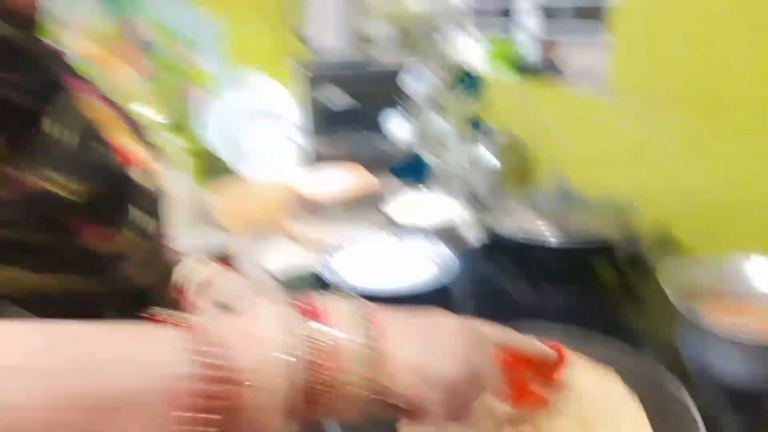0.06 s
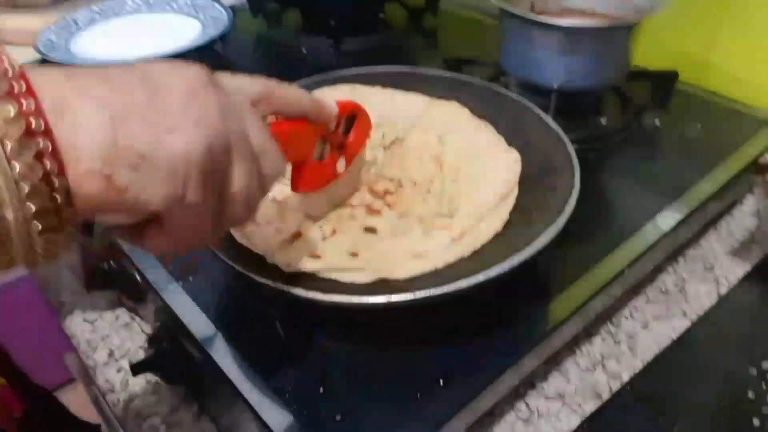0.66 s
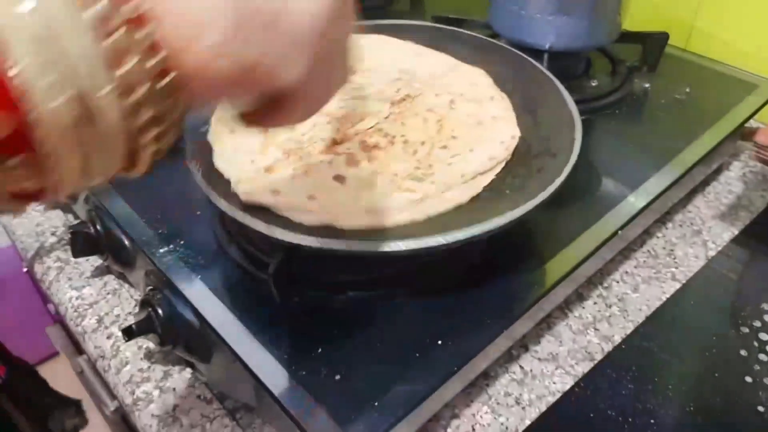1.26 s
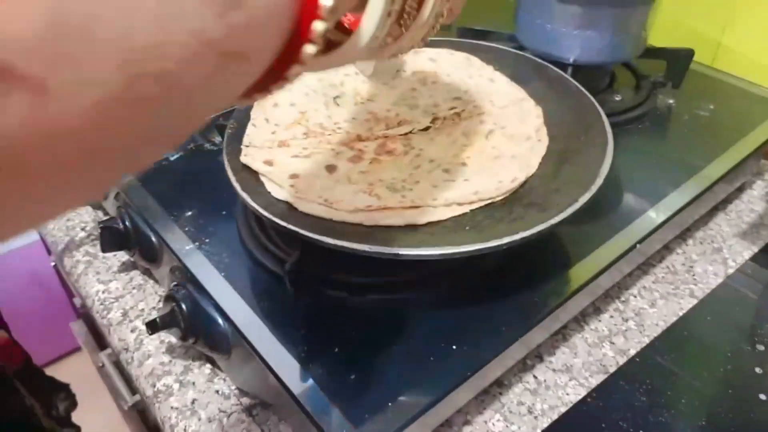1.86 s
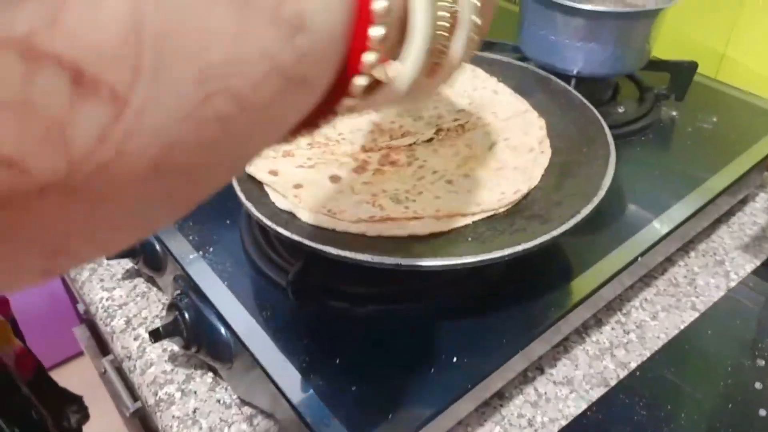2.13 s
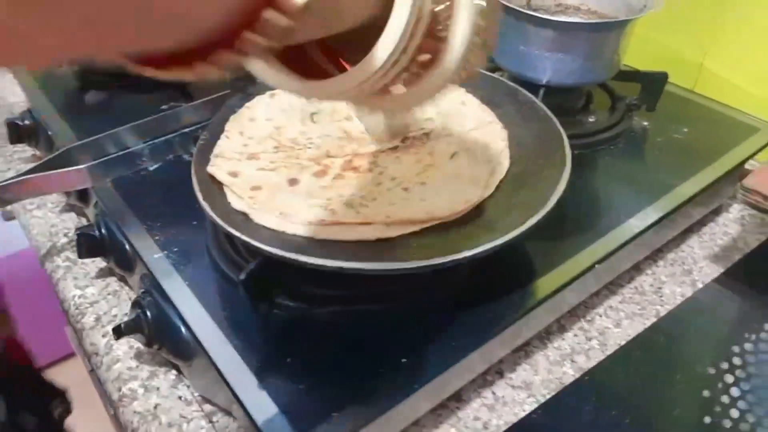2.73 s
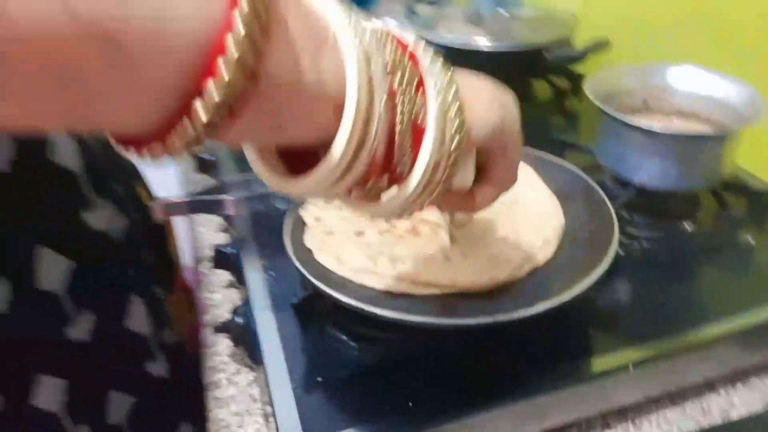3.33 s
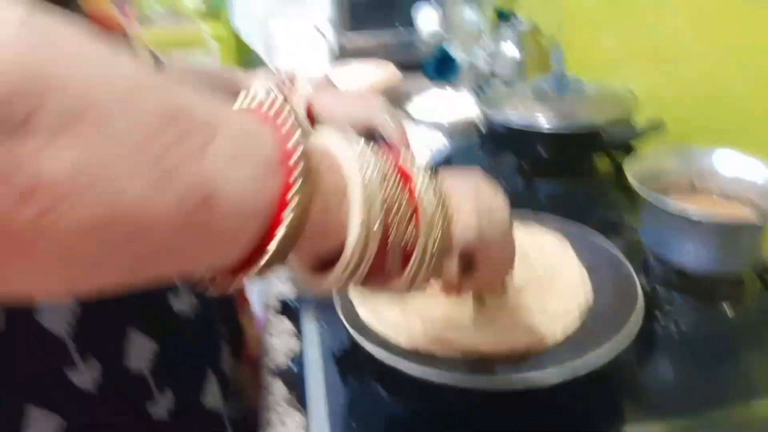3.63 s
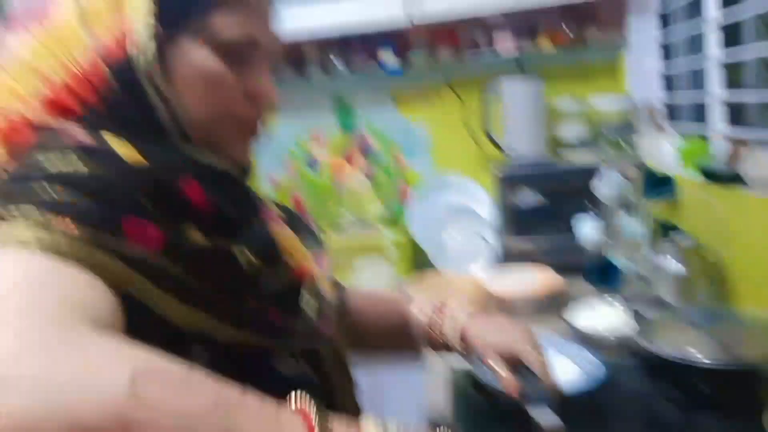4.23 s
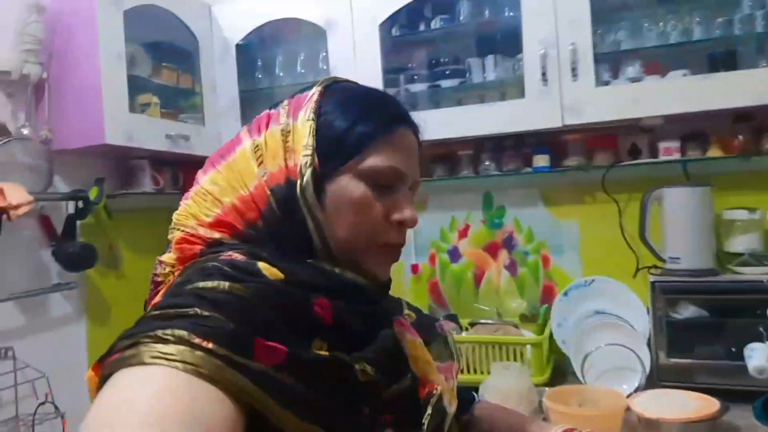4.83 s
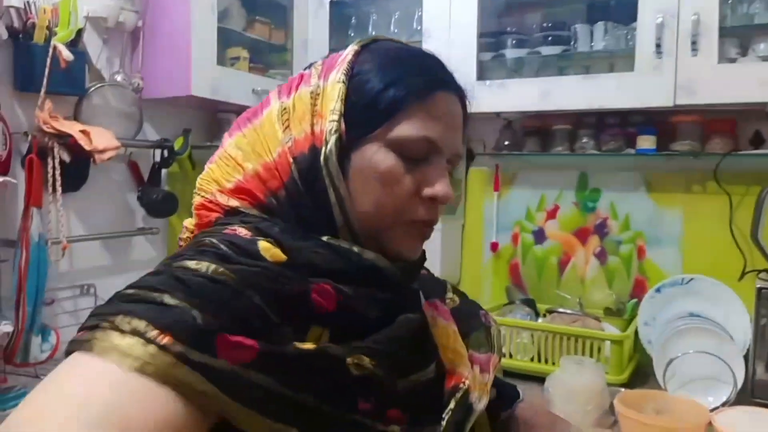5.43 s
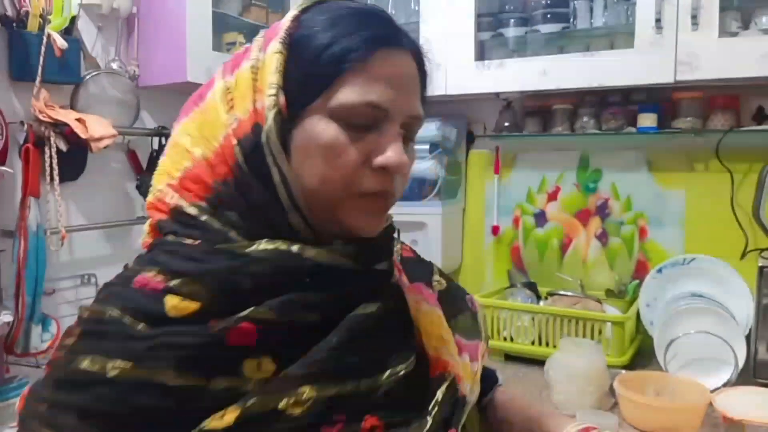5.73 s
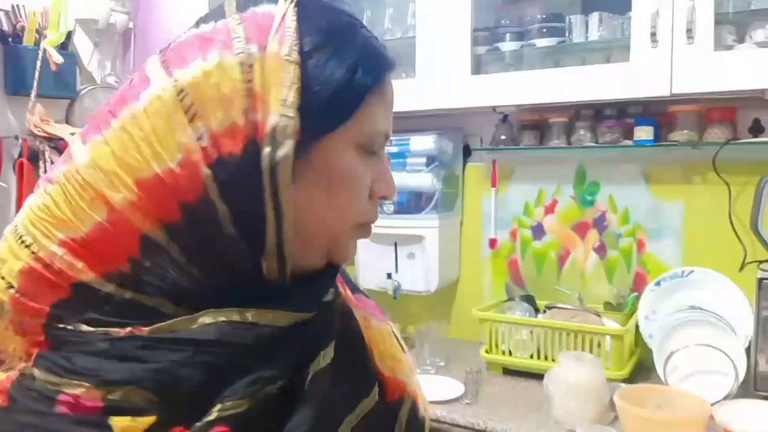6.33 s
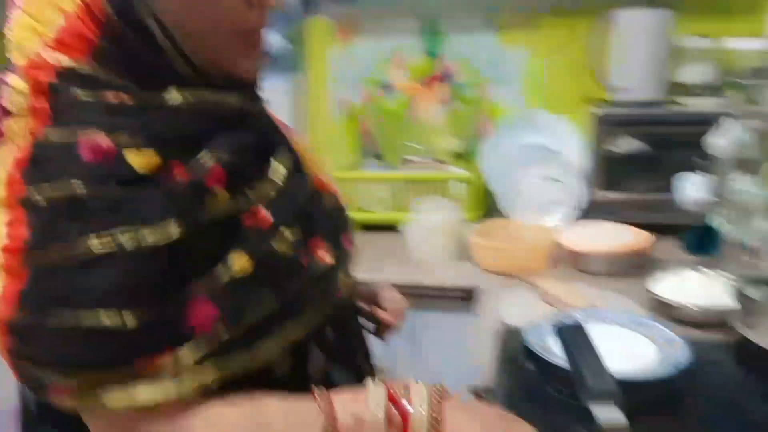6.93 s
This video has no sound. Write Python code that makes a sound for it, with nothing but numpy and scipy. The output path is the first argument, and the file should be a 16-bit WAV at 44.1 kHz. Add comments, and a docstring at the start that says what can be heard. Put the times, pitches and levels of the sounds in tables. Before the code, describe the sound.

In a small, hard-walled kitchen, a wheel cutter crunches and rubs softly through flatbread in a pan. Bangles click close by while a utensil knocks on a plate further along the counter. Early on, the wheel gives one sharp, high squeak as the pan jolts. More knocks follow over a quiet hiss. Near the end, something heavy lands and chatters on the counter, leaving steel dishes ringing.

```python
"""A small, hard-walled kitchen. A pizza cutter rolls through flatbread in a nonstick pan: the crust breaks
in grains, the bread rubs, the wheel skids and gives one sharp stick-slip squeak as the pan jolts.
A utensil knocks on a plate further along the counter, bangles click on the cutting arm, and faint hollow
notes come and go over a quiet hiss. Last, something heavy is put down: it chatters on the counter
and leaves steelware ringing."""
import sys
import numpy as np
from scipy import signal
from scipy.fft import rfft, irfft, next_fast_len
from scipy.io import wavfile

SR = 44100
rng = np.random.default_rng(int(sys.argv[2]) if len(sys.argv) > 2 else 0)


def master(y):
    """Save y as 16-bit WAV."""
    cut = np.clip(np.atleast_2d(y).T, -1, 1)
    pcm = np.round(cut * 32767)  # scale
    wavfile.write(sys.argv[1], SR, pcm.astype(np.int16))


N = 312228
T = np.arange(N) / SR
AGE_S = T[:SR]  # time since a blow


def amp(db):
    """Decibels to gain."""
    return 10 ** (np.asarray(db) / 20)


def unit(x):
    """Scale to rms 1."""
    return x / np.sqrt(np.mean(x ** 2))


def add(out, start_s, x):
    """Mix x into out from start_s on."""
    i = max(int(start_s * SR), 0)
    out[i:i + len(x)] += x[:len(out) - i]


def on_log(hz, points):
    """Read (Hz, value) points on a log-frequency axis."""
    f, value = np.transpose(points)
    return np.interp(np.log(hz + 1), np.log(f), value)


def colour(x, spectrum):
    """Filter x by a (Hz, dB) curve; rms 1."""
    size = next_fast_len(len(x))
    gain = amp(on_log(np.fft.rfftfreq(size, 1 / SR), spectrum))
    return unit(irfft(rfft(x, size) * gain, size)[:len(x)])


def resonate(x, hz, q):
    """One broad resonance."""
    return signal.lfilter(*signal.iirpeak(hz, q, fs=SR), x)


def low_cut(x, hz):
    """Fourth-order high-pass."""
    return signal.sosfilt(signal.butter(4, hz, "high", fs=SR, output="sos"), x)


def fade(t60_s, size=SR):
    """Exponential decay, 60 dB down after t60_s."""
    return np.exp(-np.log(1000) * AGE_S[:size] / t60_s)


def swell(start_s, length_s):
    """Half-sine envelope."""
    return np.sin(np.pi * np.clip((T - start_s) / length_s, 0, 1))


def burst(spectrum, t60_s, size=8192):
    """Dense modes as decaying coloured noise; the decay alone sets the energy."""
    envelope = fade(t60_s, size)
    noise = colour(rng.standard_normal(size), spectrum)
    sound = unit(noise * envelope) * np.sqrt(np.mean(envelope ** 2))
    return np.pad(sound, (0, SR - size))


def ring(modes, scatter_db):
    """Struck modes; their shares vary with the point of contact."""
    out = np.zeros(SR)
    for hz, db, t60_s in modes:
        size = min(int(1.2 * t60_s * SR), SR)
        mode = np.sin(2 * np.pi * (hz * AGE_S[:size] + rng.random())) * fade(t60_s, size)
        out[:size] += amp(db + scatter_db * rng.standard_normal()) * mode
    return out


def detune(modes, spread):
    """Grip and point of contact shift each mode from blow to blow."""
    return [(hz * (1 + spread * rng.standard_normal()), db, t60_s) for hz, db, t60_s in modes]


def walk(rate_hz):
    """Smooth random wander, spread near 1."""
    count = int(N / SR * rate_hz) + 2
    return np.interp(T * rate_hz, np.arange(count), rng.standard_normal(count))


def grains(per_s, spread_db):
    """Random impulses, a few much larger than the rest; rms 1."""
    size = amp(spread_db * np.minimum(rng.exponential(size=N), 4))
    return unit((rng.random(N) < per_s / SR) * size * rng.choice([-1, 1], N))


# room hiss: f/Hz, level/dB
HISS_SPECTRUM = [(15, -36.5), (25, -2), (151, -4), (231, -21.5), (344, -15), (382, -23), (1070, -22.5),
                 (1600, -25.5), (1730, -16.5), (2310, -19), (5260, -14), (6330, -10), (7030, -14),
                 (8690, -21), (14000, -23)]


def hiss(level_db=-59.5):
    """Quiet, steady background noise."""
    return amp(level_db) * colour(rng.standard_normal(N), HISS_SPECTRUM)


# wheel in the crust: t/s, crunch/dB, rub/dB
CUT_LEVELS = [(0.0, -54, -60), (0.12, -61.5, -56.5), (0.26, -45, -59), (0.41, -55.5, -62),
              (0.97, -53.5, -68), (1.23, -50, -64), (1.47, -53, -47), (1.66, -60, -60), (1.95, -70.5, -82),
              (2.28, -60, -91), (2.52, -58.5, -64), (2.76, -53.5, -62.5), (3.13, -62, -65.5),
              (3.25, -52, -79), (3.41, -57.5, -68), (3.73, -58, -69), (4.01, -57.5, -64.5),
              (4.18, -59, -54.5), (4.47, -61.5, -69), (4.93, -57, -59), (5.39, -58, -68.5),
              (5.6, -55, -61.5), (5.87, -68.5, -69.5), (6.15, -70, -92)]
# breaking crust, rubbing bread: f/Hz, level/dB
CRUST_SPECTRUM = [(150, -56), (900, -33.5), (1800, -2.5), (3000, -6), (4500, -0.5), (6000, -0.5),
                  (7300, 2.5), (8600, -15.5), (10000, -9.5), (12500, -4), (14000, -11)]
RUB_SPECTRUM = [(40, -10), (120, 1), (220, -2.5), (350, 2.5), (550, -8), (900, -4.5), (1500, -5.5),
                (2300, -4.5), (4000, -16.5)]


def cutting():
    """The crust breaks into fine grains and crisp flakes under the wheel; the bread rubs on the pan."""
    times_s, *levels_db = np.transpose(CUT_LEVELS)
    crust_db, rub_db = (np.interp(T, times_s, db) for db in levels_db)
    grip_db = 2 * walk(35)
    crunch = colour(grains(per_s=3000, spread_db=2), CRUST_SPECTRUM)
    flakes = amp(-8.5) * colour(grains(per_s=90, spread_db=6), CRUST_SPECTRUM)
    rub = colour(rng.standard_normal(N), RUB_SPECTRUM)
    return amp(crust_db + grip_db + 0.2) * (crunch + flakes) + amp(rub_db + grip_db + 2.5) * rub


# knocks of a utensil on a plate, and the pan's jolt as the squeak begins:
# t/s, level/dB, hollow f/Hz, relative ping/dB, relative treble/dB, drag/0-1
KNOCK_EVENTS = [(0.024, -28, 1400, -7.5, -8.5, 0), (0.213, -17.5, 940, -15.5, -10.5, 0.23),
                (0.224, -24, 1900, -9, -16, 0), (1.404, -25, 1290, -14, -22, 0.3),
                (1.587, -26.5, 1360, -8, -26, 0), (2.372, -30, 1410, -6.5, -13.5, 0.18),
                (2.851, -21, 1530, -5, -17, 0.11), (3.93, -26, 1005, -5.5, -20, 0.04),
                (4.168, -19, 910, -11.5, -25, 0.46), (4.476, -31.5, 1036, -14.5, -33, 0.4),
                (4.68, -18, 850, -15.5, -17, 0.3), (4.875, -22, 996, -19, -23, 0.24),
                (5.119, -21.5, 890, -11, -14, 0.55), (5.162, -35.5, 450, -23, -30, 0),
                (5.389, -24, 1030, -18, -18.5, 0.05), (5.564, -24.5, 1900, -7.5, -15, 0),
                (5.582, -23.5, 1990, -14, -16, 0)]
# plate, steel ping: f/Hz, level/dB, t60/s
PLATE_MODES = [(468, -15, 0.24), (848, -9, 0.09), (1306, -1.5, 0.024), (1881, -6, 0.061),
               (2235, 4.5, 0.036), (2690, -4, 0.076), (3730, -25, 0.033), (3860, -4.5, 0.018),
               (4689, 5, 0.042), (5200, -42, .12), (5320, -8.5, 0.11), (6330, 8, 0.016), (6160, -11, 0.04),
               (6974, 3, 0.061), (7240, 4, 0.061)]
BLADE_MODES = [(6024, 3, 0.02), (6090, 0, 0.022), (6440, -31, 0.12), (7600, -14, 0.04), (11000, -24, 0.044),
               (11600, -30, 0.055)]
# crack, thud and treble of a contact: f/Hz, level/dB
CRACK_SPECTRUM = [(60, -61), (300, -47), (900, -6.5), (1300, -12), (2300, -4.5), (3300, -8), (4800, -5.5),
                  (6200, 0), (7400, -3.5), (8500, -16), (14000, -48)]
THUD_SPECTRUM = [(30, -28), (80, 4), (150, -4.5), (220, -11.5), (310, 1), (420, -2), (520, -6), (650, -2.5),
                 (950, -8), (1400, -34), (3000, -45)]
TREBLE_SPECTRUM = [(6000, -17), (8600, -30), (10000, -4.5), (12000, 1), (14000, -12)]


def knocks(contact_s=0.00065, typical_db=-20.5):
    """Utensil on plate, or pan jolt: a bright clack, a hollow body. Returns direct sound, room feed."""
    direct, room_feed = np.zeros(N), np.zeros(N)
    attack = 1 - np.exp(-AGE_S / contact_s)
    for t, db, hz, ping_db, treble_db, _ in KNOCK_EVENTS:
        clack = amp(-11) * burst(CRACK_SPECTRUM, t60_s=0.03)
        clack += amp(-22.5) * ring(detune(PLATE_MODES, spread=0.011), scatter_db=3)
        clack += amp(ping_db) * ring(detune(BLADE_MODES, spread=0.0098), scatter_db=2.5)
        clack += amp(treble_db) * burst(TREBLE_SPECTRUM, t60_s=0.02)
        # pitch depends on where the blow lands
        hollow = [(hz / 3, -35), (hz / 0.91, -10), (hz, 0), (hz * 0.72, -12), (hz * 2, -35)]
        body = amp(-18.5) * (burst(hollow, t60_s=0.028) + burst(THUD_SPECTRUM, t60_s=0.08))
        room_db = 1.5 - 0.29 * (db - typical_db)  # louder knocks are nearer, so drier
        add(direct, t + 0.0005, amp(db + 3) * attack * (clack + amp(-2) * body))
        add(room_feed, t + 0.001, amp(db + room_db) * (clack + body))
    return low_cut(direct, hz=125), low_cut(room_feed, hz=120)


# wheel skids: t/s, length/s, level/dB, f/Hz
WHEEL_SKIDS = [(0.035, 0.038, -44.5, 4470), (0.612, 0.11, -51.5, 3000), (1.27, 0.078, -47, 1370),
               (3.236, 0.05, -46.5, 2000), (3.775, 0.12, -51.5, 1960)]


def scrapes(drag_s=0.058, drag_db=-17, drag_hz=2270):
    """Dense slips: the wheel skids on the pan; an edge drags just before most knocks."""
    slips = colour(grains(per_s=3300, spread_db=4.5), CRACK_SPECTRUM)
    drags = [(t - drag_s, drag_s, db + drag_db + 20 * np.log10(drag), drag_hz)
             for t, db, *_, drag in KNOCK_EVENTS if drag > 0]
    out = np.zeros(N)
    for t, length_s, db, hz in WHEEL_SKIDS + drags:
        out += amp(db) * swell(t, length_s) * unit(resonate(slips, hz, q=1))
    return out


def click(hz):
    """A light contact: a bright tick over a short resonance that lasts longer at low pitch."""
    spectrum = [(hz / 20, -46), (hz / 5, -22), (hz / 1.57, -11), (hz, 0),
                (hz * 1.27, -10), (hz * 2.55, -16), (hz * 6, -30)]
    resonance = amp(-10) * burst(spectrum, t60_s=0.031 * (4000 / hz) ** 0.5)
    crack = amp(-15.5) * burst(CRACK_SPECTRUM, t60_s=0.032)
    treble = amp(-21) * burst(TREBLE_SPECTRUM, t60_s=0.027)
    return resonance + crack + treble


# bangle and cutter contacts: t/s, level/dB, f/Hz
LIGHT_CONTACTS = [(0.065, -17.5, 4900), (0.096, -24, 4200), (0.301, -22.5, 1480), (0.483, -32, 1600),
                  (0.636, -32, 7260), (0.671, -30, 7250), (0.734, -28.5, 7250), (0.773, -22.5, 4170),
                  (0.777, -23, 3500), (0.979, -35.5, 1460), (1.088, -30.5, 4040), (1.115, -33.5, 1300),
                  (1.215, -23.5, 5800), (1.22, -15, 6700), (1.969, -29.5, 5800), (2.169, -36.5, 7400),
                  (2.517, -33.5, 1360), (2.579, -32.5, 890), (2.609, -26.5, 6600), (2.633, -24, 4850),
                  (3.05, -23.5, 5700), (3.071, -21.5, 5960), (3.085, -20.5, 6400), (3.083, -28, 2000),
                  (3.219, -34, 1990), (3.266, -27, 1640), (3.395, -35.5, 3960), (3.657, -29, 4360),
                  (3.749, -27.5, 1740), (4.66, -19, 2400), (5.102, -17, 4500), (5.78, -34, 4850),
                  (5.834, -33.5, 4760), (6.811, -32.5, 6540)]


def bangles_and_cutter():
    """Bangles and cutter click as they touch. Returns direct sound, room feed."""
    direct, room_feed = np.zeros(N), np.zeros(N)
    for t, db, hz in LIGHT_CONTACTS:
        hit = amp(db) * click(hz)
        room_db = -2 - 0.5 * np.log2(hz / 4000)  # high clicks are the nearby bangles, so drier
        add(direct, t, hit)
        add(room_feed, t, amp(room_db) * hit)
    return direct, room_feed


def ticks(per_s=2.5, low_hz=1980, high_hz=6900):
    """Faint chance contacts, louder when the wheel bears down."""
    out = np.zeros(N)
    times_s, crust_db, _ = np.transpose(CUT_LEVELS)
    end_s = times_s[-1]
    for when, pitch in rng.random((int(per_s * end_s), 2)):
        t = when * end_s
        hz = low_hz * (high_hz / low_hz) ** pitch
        add(out, t, amp(np.interp(t, times_s, crust_db) + 20.5) * click(hz))
    return out


# hollow notes: t/s, length/s, level/dB, f/Hz
HOLLOW_NOTES = [(1.307, 0.09, -49, 627), (1.666, 0.25, -59.5, 616), (2.195, 0.75, -63.5, 338.5),
                (4.344, 0.28, -62, 465)]
# their partials: frequency ratio, level/dB
NOTE_PARTIALS = [(1, 1), (1.31, -8.5), (2.15, -7)]


def hollow_notes():
    """Faint rough notes swell and fade, wandering in level and phase."""
    out = np.zeros(N)
    for t, length_s, db, hz in HOLLOW_NOTES:
        for ratio, partial_db in NOTE_PARTIALS:
            wobble = walk(80) + 1j * walk(80)
            partial = np.real(wobble * np.exp(2j * np.pi * ratio * hz * T))
            out += amp(db + partial_db) * swell(t, length_s) * partial
    return out


# cutter slips: t/s, f/Hz, level/dB, rise/s, t60/s
CUTTER_SLIPS = [(1.405, 6110, -12, 0.0083, 0.12), (1.588, 6050, -34.5, 0.0021, 0.059),
                (1.675, 5900, -63.5, 0.012, 1.7)]
# their rasp: f/Hz, level/dB
RASP_SPECTRUM = [(40, -8), (80, -2), (160, -19), (300, 5), (550, -5), (1200, -4.5), (2100, -1.5),
                 (3200, -9), (5000, -1), (6200, 8.5), (7300, 8.5), (8600, -46), (10500, -3), (12300, 5),
                 (14000, -24)]


def squeak(onset_db=-13, octave_lag_s=0.005):
    """Metal sticks and slips: an unsteady high tone swells and dies; octave and rasp follow its level."""
    out = np.zeros(N)
    for t, hz, db, rise_s, t60_s in CUTTER_SLIPS:
        rise = amp(db + onset_db * np.clip(1 - (T - t) / rise_s, 0, 1)) * (T > t)
        level = rise * np.exp(-np.log(1000) * np.maximum(T - t - rise_s, 0) / t60_s)
        octave_level = amp(3) * np.interp(T - octave_lag_s, T, level) ** 1.78
        phase = 2 * np.pi * np.cumsum(hz * (1 + 0.01318 * walk(500))) / SR
        tone = level * np.sin(phase) + octave_level * np.sin(2 * phase)
        flutter = amp(1.8 * walk(300))
        rasp = colour(grains(per_s=5000, spread_db=3), RASP_SPECTRUM)
        out += np.sqrt(2) * flutter * tone + amp(-14) * level ** 0.7 * rasp
    return out


# jolts under the squeak: t/s, level/dB
JOLTS = [(1.412, -37), (1.59, -47.5)]
# pan: f/Hz, level/dB, t60/s
PAN_MODES = [(58, -5, .2), (85, -3, 0.31), (243.6, 5, 0.47), (350, -13, .2), (620, -5, 0.55),
             (805, -24, 0.16), (1160, -15, .2), (1355, 10, 0.19), (2030, 5, 0.42)]


def pan():
    """The pan jolts on its burner as the cutter bears down."""
    out = np.zeros(N)
    for t, db in JOLTS:
        add(out, t, amp(db - 9) * ring(PAN_MODES, scatter_db=1.5))
    return out


# heavy object touches, lands, rocks to rest: t/s, thump/dB, crash/dB
LANDINGS = [(6.203, -34.5, -37.5), (6.298, -31.5, -32.5), (6.311, -33, -30), (6.345, -16.5, -19.5),
            (6.352, -19.5, -12.5), (6.374, -32.5, -20.5), (6.404, -19.5, -17.5), (6.441, -21, -27),
            (6.459, -26.5, -23.5), (6.613, -43.5, -69), (6.645, -44.5, -61), (6.689, -41.5, -64)]
# thump and crash of a landing: f/Hz, level/dB
THUMP_SPECTRUM = [(25, -41.5), (70, -21), (120, -9.5), (200, -5.5), (245, -8.5), (290, 8.5), (400, -15),
                  (580, -12.5), (700, -11), (1000, -14.5), (1400, -25), (3000, -36)]
CRASH_SPECTRUM = [(60, -40), (400, -19), (1200, -20), (2300, -5.5), (3500, 5), (5000, 0), (7200, 6),
                  (8700, -5.5), (10500, -13.5), (12500, -15), (14000, -19.5)]
# counter, steelware: f/Hz, level/dB, t60/s
COUNTER_MODES = [(214, -5, 0.14), (295.5, 3, 0.21), (333, -26, 0.13), (496, -10, 0.16)]
STEEL_MODES = [(657, -28, 4.7), (1640, -30, 1.3), (2930, -16.5, 1.22), (3130, -20, .35), (3590, -6, 0.194),
               (4380, -14, 0.71), (4980, -2.5, 0.42), (5373, -10, 0.27), (6150, -6, 0.51), (6740, 0, 0.32),
               (7192, -3, 0.47), (7100, 0, .22), (12050, -2.5, .15), (12400, -8.5, 0.51)]


def clatter(first_gap_s=0.008, gap_growth=1.4, thump_loss_db=4, crash_loss_db=8, rest_db=-40):
    """A heavy object lands and chatters: the counter booms; steel jangles, damped by the contacts."""
    out = np.zeros(N)
    damped_steel = [(hz, db, 0.11) for hz, db, _ in STEEL_MODES]
    for t, thump_db, crash_db in LANDINGS:
        for bounce in range(5):
            thump = amp(-2) * burst(THUMP_SPECTRUM, t60_s=0.064)
            thump += amp(-14) * ring(detune(COUNTER_MODES, spread=0.019), scatter_db=0.5)
            crash = amp(-2) * burst(CRASH_SPECTRUM, t60_s=0.044)
            crash += amp(-14.5) * ring(detune(damped_steel, spread=0.0079), scatter_db=3.5)
            add(out, t, amp(thump_db) * thump + amp(crash_db) * crash)
            if thump_db < rest_db:
                break
            t += first_gap_s * gap_growth ** bounce
            thump_db -= thump_loss_db
            crash_db -= crash_loss_db
    return low_cut(out, hz=145)


def steelware(struck_s=6.354, level_db=-31.5):
    """The hardest blow of the clatter sets steel dishes ringing."""
    out = np.zeros(N)
    add(out, struck_s, amp(level_db) * ring(STEEL_MODES, scatter_db=0))
    return out


# kitchen reverberation: f/Hz, t60/s
ROOM_DECAY = [(150, 0.43), (400, 0.4), (1000, 0.31), (2800, 0.41), (7300, 0.19), (13000, 0.16)]


def kitchen(x, early_s=0.039, build_s=0.00052):
    """Dense early reflections from tiles and cupboards, then a tail whose treble dies first."""
    hz = np.fft.rfftfreq(SR, 1 / SR)
    spectrum = np.exp(2j * np.pi * rng.random(len(hz)))
    edges_hz = np.append(0, np.geomspace(150, SR / 2, num=10))
    early = np.exp(-(AGE_S / early_s) ** 2)
    response = np.zeros(SR)
    for lo, hi in zip(edges_hz, edges_hz[1:]):
        band = irfft(spectrum * (hz >= lo) * (hz < hi), SR)
        late = amp(5) * fade(on_log((lo + hi) / 2, ROOM_DECAY))
        response += band * (early + late)
    response *= 1 - np.exp(-AGE_S / build_s)
    return signal.fftconvolve(x, response / np.sqrt(np.sum(response ** 2)))[:N]


def scene():
    """Mono mix; knocks, clicks, clatter, squeak and scrapes also feed the room."""
    knock, knock_feed = knocks()
    clicks, click_feed = bangles_and_cutter()
    crash, squeal, scrape = clatter(), squeak(), scrapes()
    direct_only = hiss() + steelware() + pan() + cutting() + ticks() + hollow_notes()
    room = kitchen(knock_feed + click_feed + amp(-3) * crash + amp(-4.5) * squeal + amp(-8) * scrape)
    return (knock + clicks + crash + squeal + scrape + direct_only + room)[None]


def record(dry, top_hz=14100):
    """The sound loses its deep bass, dips near 8.7 kHz and ends at 14 kHz."""
    thin = low_cut(dry, hz=41.5)
    dipped = thin - 0.62 * resonate(thin, hz=8730, q=4.8)
    return signal.sosfilt(signal.ellip(10, 0.2, 70, top_hz, fs=SR, output="sos"), dipped)


dry = scene()
out = record(dry)
master(out)
```